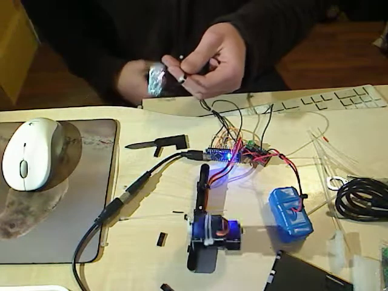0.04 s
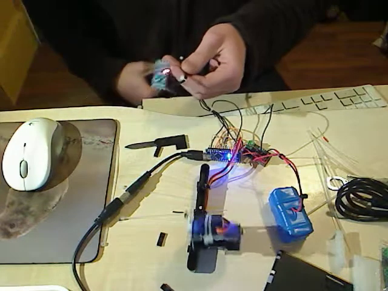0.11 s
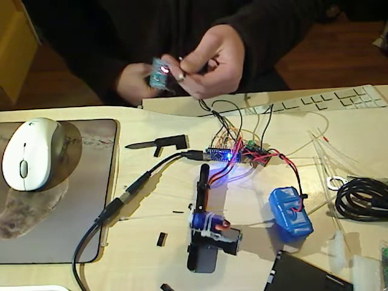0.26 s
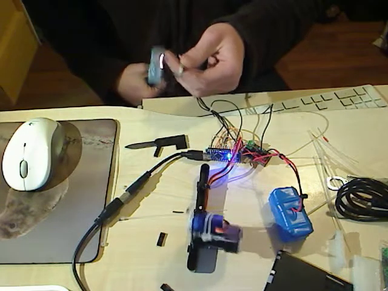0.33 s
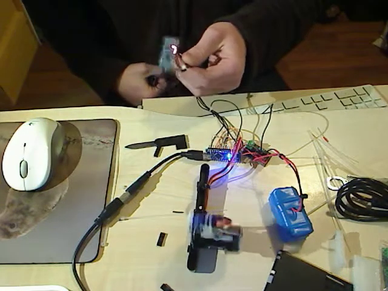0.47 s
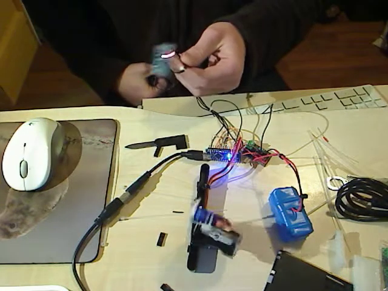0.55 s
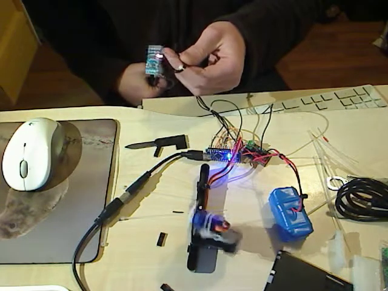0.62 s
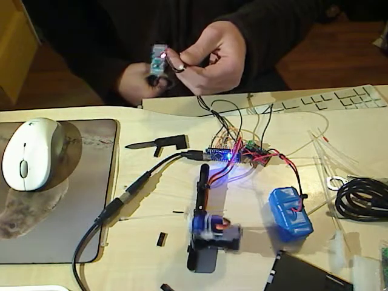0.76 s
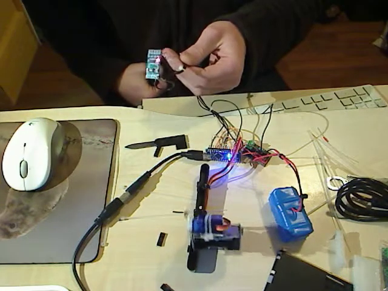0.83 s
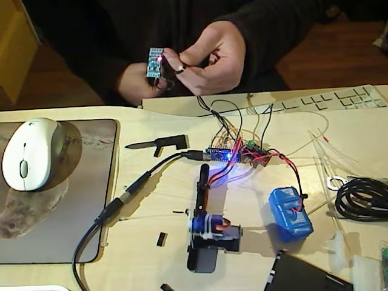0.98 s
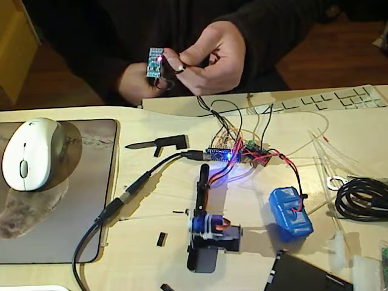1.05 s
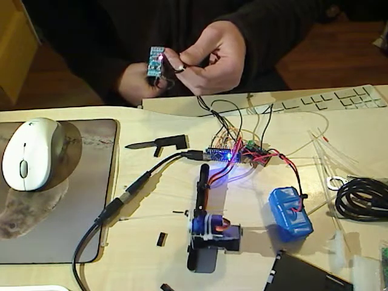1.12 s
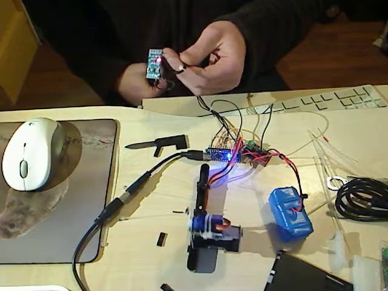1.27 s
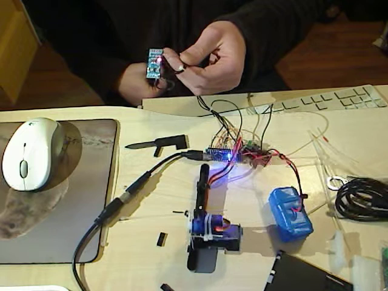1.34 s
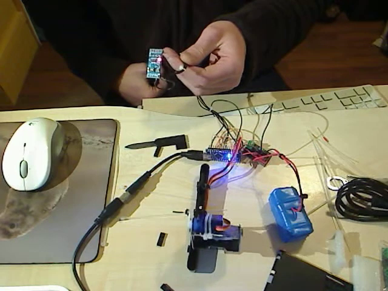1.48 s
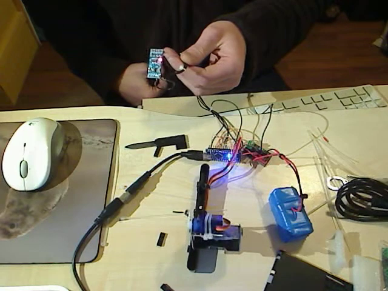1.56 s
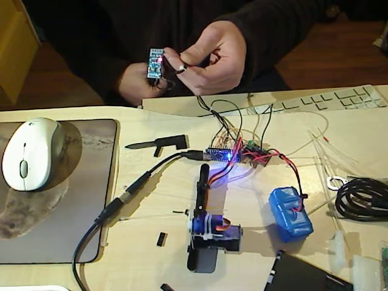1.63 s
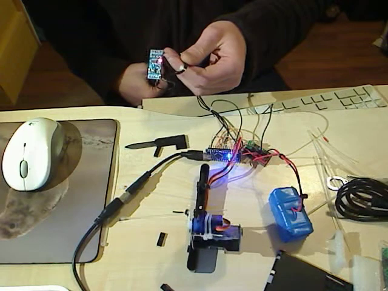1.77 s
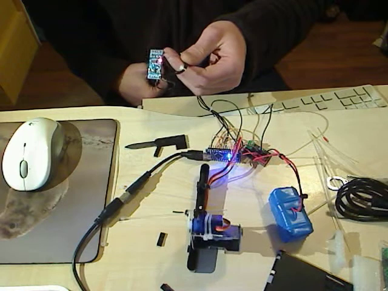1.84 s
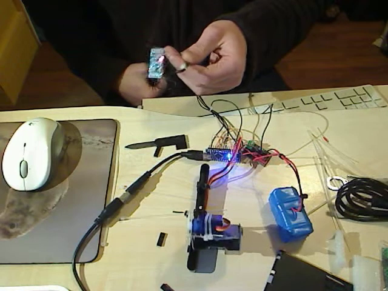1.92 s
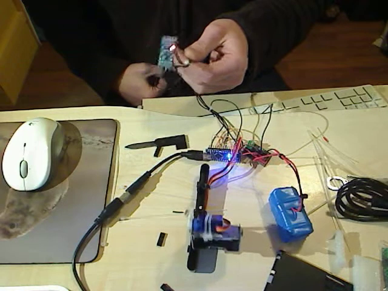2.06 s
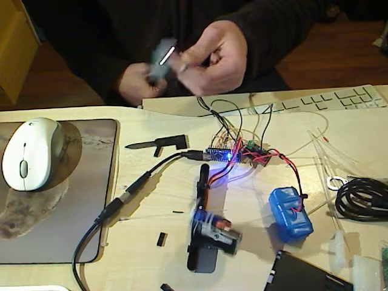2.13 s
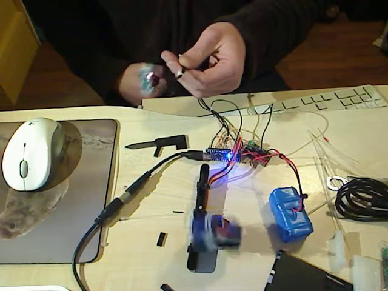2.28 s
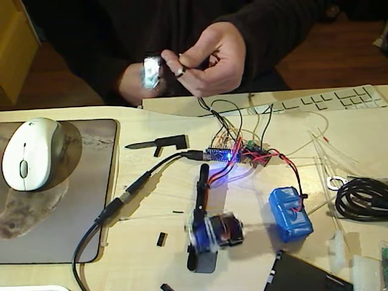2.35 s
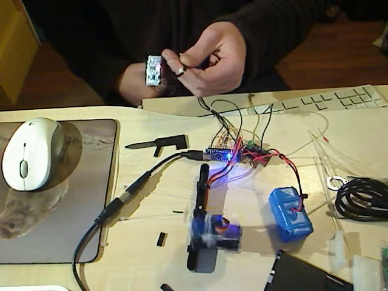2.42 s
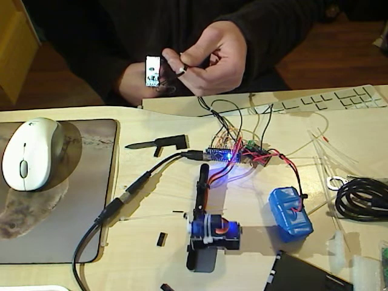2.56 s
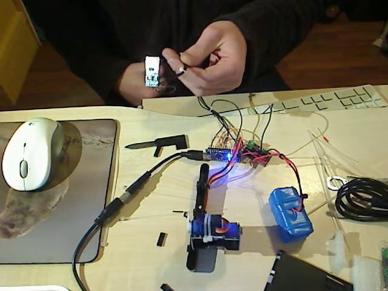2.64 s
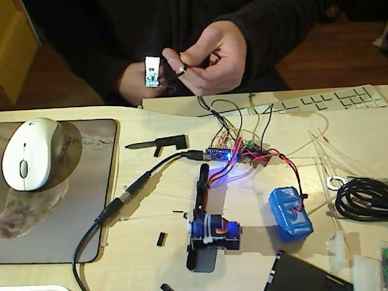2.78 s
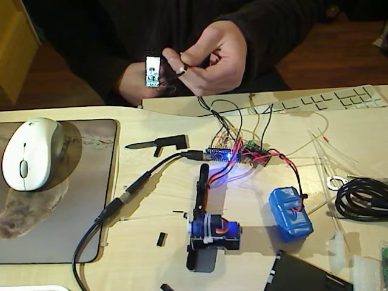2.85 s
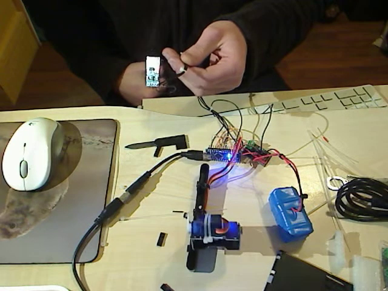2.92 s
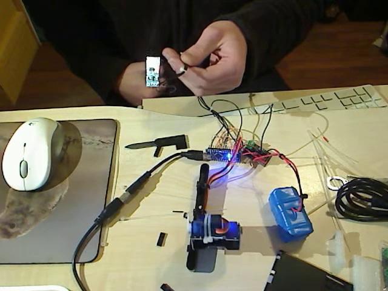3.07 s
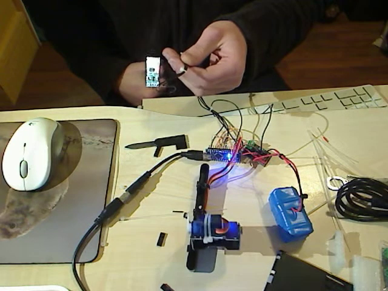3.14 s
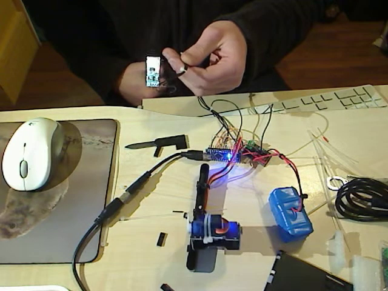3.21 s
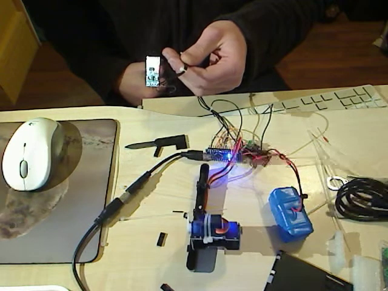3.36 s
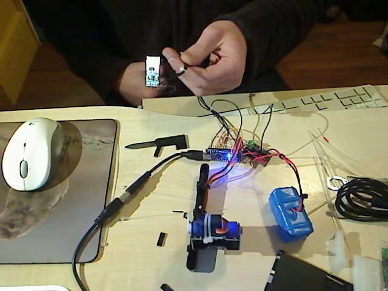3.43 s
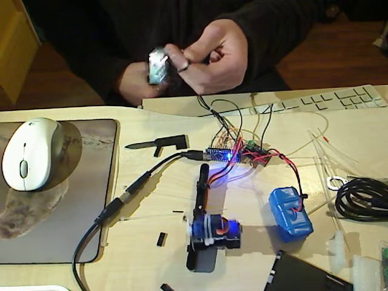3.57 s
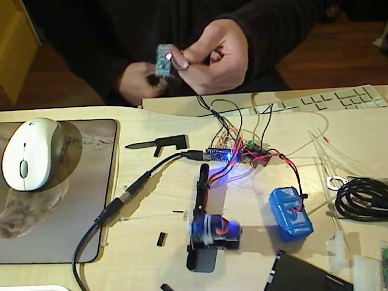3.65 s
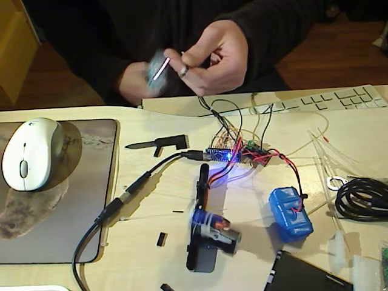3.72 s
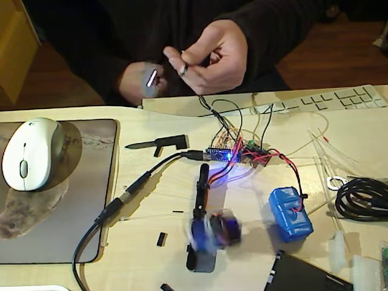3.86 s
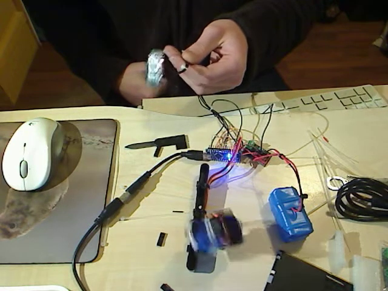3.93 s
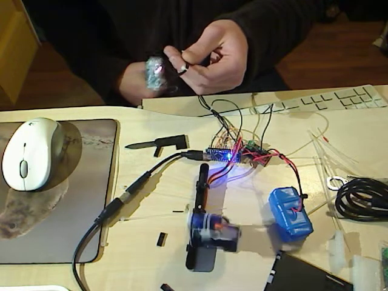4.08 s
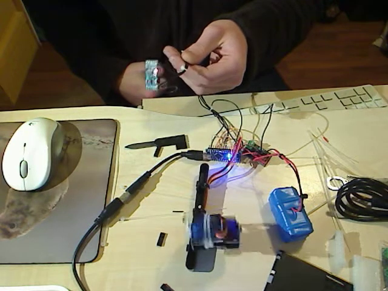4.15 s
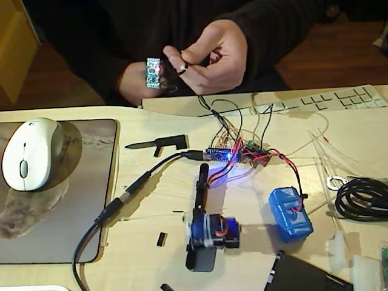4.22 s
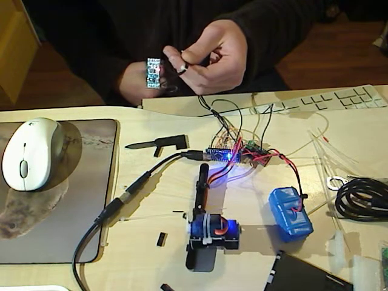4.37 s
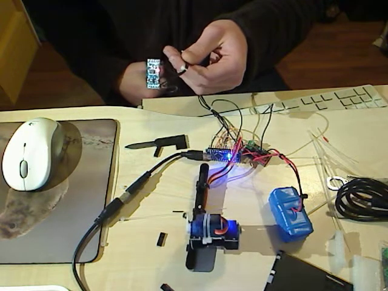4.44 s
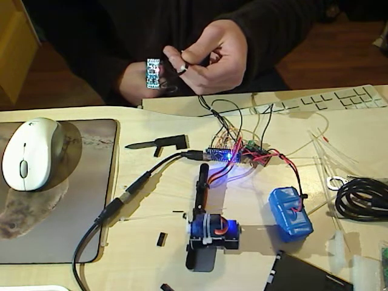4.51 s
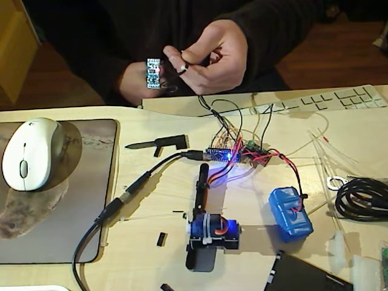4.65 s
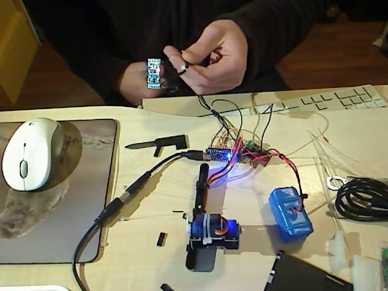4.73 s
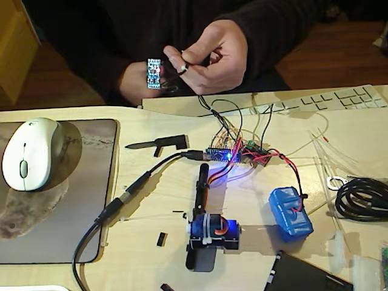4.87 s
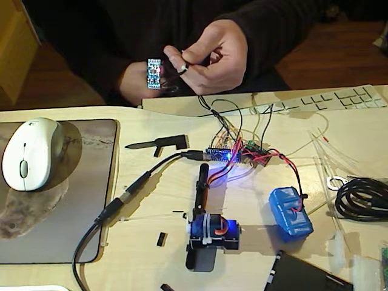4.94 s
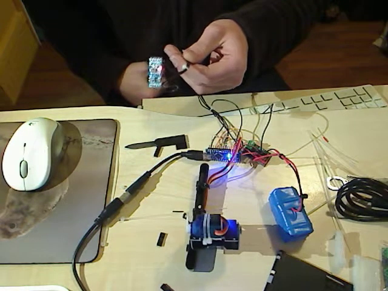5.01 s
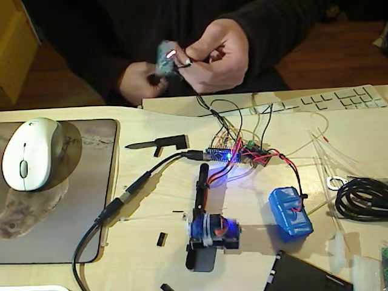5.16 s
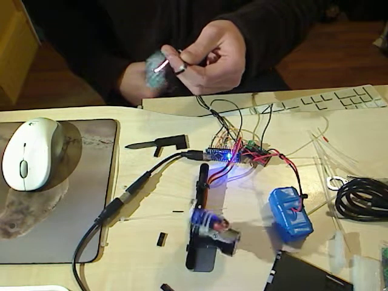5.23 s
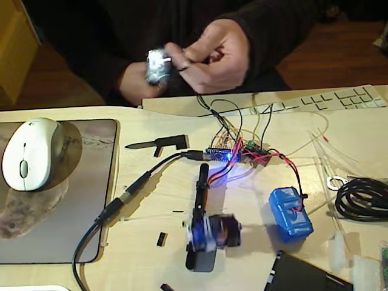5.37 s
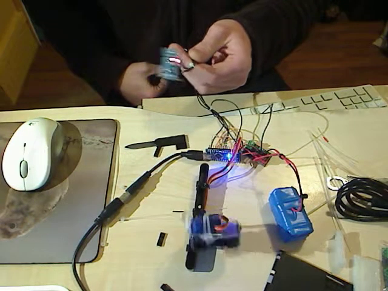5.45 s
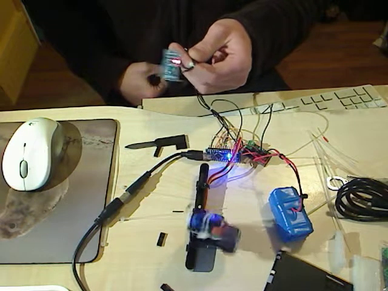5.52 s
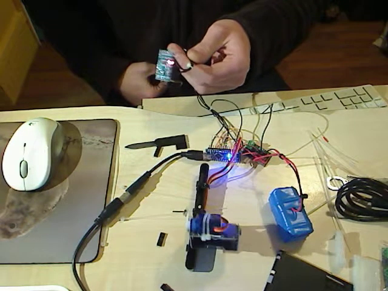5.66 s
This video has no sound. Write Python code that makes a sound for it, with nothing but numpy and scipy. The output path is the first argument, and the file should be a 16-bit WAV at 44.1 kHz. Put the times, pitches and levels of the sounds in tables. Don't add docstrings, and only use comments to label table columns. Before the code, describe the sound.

Tiny plastic gear motors buzz through quick swings and stuttering clicks, thudding on a desktop in a quiet, softly humming room.

```python
import sys
import numpy as np
from scipy import signal
from scipy.fft import rfft, irfft
from scipy.io import wavfile
from scipy.ndimage import uniform_filter1d

SR = 44100
rng = np.random.default_rng(int(sys.argv[2]) if len(sys.argv) > 2 else 0)


def digitize_waveform(pressure):
    field = np.atleast_2d(pressure).T
    bounded = np.clip(field, -1, 1)
    quanta = np.round(bounded * 32767).astype(np.int16)
    wavfile.write(sys.argv[1], SR, quanta)


def level_to_linear(level):
    exponent = np.asarray(level, float) / 20
    return 10 ** exponent


N = 250912
T = np.arange(N) / SR


def level(x, rms_db=0):
    return x * level_to_linear(rms_db) / np.sqrt(np.mean(x ** 2))


def band(x, lo_hz, hi_hz, order=2):
    return signal.sosfilt(signal.butter(order, [lo_hz, hi_hz], "band", fs=SR, output="sos"), x)


def around(x, hz, width_hz, order=2):
    return band(x, hz - width_hz / 2, hz + width_hz / 2, order)


def colour(x, points, size=4096):
    hz, db = np.transpose(points)
    bins_hz = np.arange(1, size // 2 + 2) * SR / size
    gain = level_to_linear(np.interp(np.log(bins_hz), np.log(hz), db))
    cepstrum = irfft(np.log(gain))
    cepstrum[1:size // 2] *= 2
    cepstrum[size // 2 + 1:] = 0
    impulse = irfft(np.exp(rfft(cepstrum)))
    return signal.fftconvolve(x, impulse)[:len(x)]


def walk(rate_hz):
    hold = int(SR / rate_hz)
    steps = np.repeat(rng.standard_normal(N // hold + 1), hold)
    return 1.51 * uniform_filter1d(uniform_filter1d(steps, hold), hold)[:N]


def add(out, start_s, piece):
    i = int(start_s * SR)
    out[i:i + len(piece)] += piece[:N - i]


def fade(t, t60_s):
    return np.exp(-np.log(1000) * t / t60_s)


def ramp(start_s, end_s, slew_s):
    return np.minimum(T - start_s, end_s - T) / slew_s


# frequency in Hz, density in dB per Hz.
HUSH_SPECTRUM = [(15, -25), (25, 6), (70, -19.5), (102, -6.5), (166, -11.5), (197, -12), (258, -15.5),
                 (466, -16.5), (540, -21), (582, -21), (744, -20), (1160, -23), (2190, -31.5),
                 (6010, -29.5), (8910, -50.5), (11600, -86), (19600, -120)]
HUSH_DB = -55
# centre in Hz, wander width in Hz, level in dB.
HUMS = [(48.4, 4.5, -64), (97.8, 6.3, -63.5), (1148, 26, -75.5)]


def room():
    hush = level(colour(rng.standard_normal(N), HUSH_SPECTRUM), HUSH_DB - 3.5)
    hush = hush * level_to_linear(0.17 * walk(8.9))
    hum = sum(level(around(rng.standard_normal(N), hz, width_hz, order=1), db) for hz, width_hz, db in HUMS)
    steady = level_to_linear(-63.5) * np.sin(2 * np.pi * HUMS[1][0] * T)
    return hush + hum + steady


# start in seconds, peak in dB, ring in Hz, t60 in seconds.
DESK_THUDS = [
    (0.592, -43.5, 818, 0.069),
    (2.554, -40, 470, 0.12),
    (3.828, -39, 610, 0.084),
    (4.153, -32.5, 753, 0.13),
    (4.263, -44, 770, 0.12),
    (5.293, -53, 990, 0.084),
]


def thuds():
    out, t = np.zeros(N), T[:6000]
    for start_s, db, hz, t60_s in DESK_THUDS:
        noise = rng.standard_normal(len(t))
        board = np.sin(2 * np.pi * hz * t) + .6 * np.sin(2 * np.pi * .68 * hz * t)
        board += level(band(noise, 400, 950), -3)
        add(out, start_s, level_to_linear(db - 4) * np.minimum(t / 0.0021, 1) * fade(t, t60_s) * board)
    return out


# start in seconds, peak in dB, ring in Hz, upper ring in dB re lower.
PLASTIC_SNAPS = [
    (3.9812, -40, 1950, 8),
    (4.157, -38.5, 1610, 3),
    (5.5159, -26.5, 1820, -7),
    (5.57, -28.5, 1890, -7),
]


def snaps():
    out, t = np.zeros(N), T[:6000]
    for start_s, db, hz, upper_db in PLASTIC_SNAPS:
        rings = np.sin(2 * np.pi * hz * t) + level_to_linear(upper_db) * np.sin(2 * np.pi * 1.585 * hz * t)
        add(out, start_s, level_to_linear(db) * np.minimum(t / .001, 1) * fade(t, .014) * rings)
    return out


# time in seconds, tooth rate in Hz, level in dB.
MESH_WHINES = [
    [(2.4, 3460, -70), (2.406, 3710, -78), (2.418, 3493, -28), (2.46, 3290, -43)],
    [(3.97, 3300, -49), (3.996, 3635, -32), (4.024, 3404, -26.5), (4.04, 3490, -38.5), (4.05, 3707, -71)],
    [(4.25, 3100, -44.5), (4.264, 3200, -36), (4.274, 3180, -38), (4.29, 3580, -48)],
    [(5.56, 3600, -31), (5.588, 4770, -39), (5.6, 4744, -61), (5.61, 4450, -62)],
]


def whines():
    out, waver, throb = np.zeros(N), walk(500), walk(250)
    for rows in MESH_WHINES:
        s, hz, db = np.transpose(rows)
        gate = np.clip(ramp(s[0], s[-1], 0.0027), 0, 1)
        tooth_hz = np.interp(T, s, hz) * (1 + .025 * waver)
        phase = 2 * np.pi * np.cumsum(tooth_hz) / SR
        out += gate * level_to_linear(np.interp(T, s, db) + 1.45 * throb) * np.sin(phase)
    return out


FRAME_S, FIRST_FRAME_S = .02001, .0132
KICK_HZ, KICK_SPREAD_HZ, KICK_SPREAD_DB = 3760, 170, 1.2
KICK_UPPER_DB, KICK_UPPER_SPREAD_DB = -8.5, 4
# start in seconds, length in seconds, first kick in dB, last kick in dB, creep in dB.
EARLY_NUDGES = [(0.138, 0.0091, -40, -35, -65), (0.21, 0.011, -38.5, -39, -62),
                (.253, 0.039, -41, -44, -54.5), (0.456, .01, -32, -40, -57), (1.137, 0.033, -48, -39, -75),
                (1.217, 0.055, -42, -36.5, -55), (1.304, 0.067, -38, -41, -55),
                (1.387, 0.088, -36, -39, -53), (1.521, 0.072, -52, -39, -58),
                (1.598, 0.063, -47, -47, -60.5), (1.687, 0.047, -49, -39, -61.5),
                (1.78, 0.039, -39.5, -47, -64), (1.833, 0.033, -56, -47, -60.5),
                (1.88, 0.11, -41, -50.5, -65.5), (1.991, .07, -45, -52, -63.5),
                (2.077, 0.034, -45, -39.5, -52.5), (2.121, 0.045, -38, -45, -53),
                (2.196, 0.08, -35.5, -37, -52.5)]
LATE_NUDGES = [(2.655, .01, -37.5, -34, -65), (2.735, 0.048, -42, -36, -55.5),
               (2.855, 0.056, -45.5, -36, -61.5), (2.955, 0.081, -44.5, -42.5, -66.5),
               (3.055, 0.02, -54, -59, -70), (3.295, .05, -47, -43, -65.5), (3.355, 0.038, -46, -36.5, -61),
               (3.455, .01, -43.5, -43, -69), (3.535, 0.086, -45.5, -42.5, -66.5),
               (3.635, .01, -42, -40, -63.5), (3.655, .05, -56, -37.5, -63.5),
               (3.715, 0.038, -41.5, -32, -59), (3.795, 0.04, -36.5, -32.5, -53),
               (4.456, 0.052, -40.5, -47, -58), (4.536, 0.061, -47.5, -43.5, -58),
               (4.636, 0.053, -46.5, -35.5, -57), (4.696, 0.018, -46, -52, -59),
               (4.756, .01, -45.5, -48, -74), (4.816, 0.0077, -49.5, -45, -63),
               (4.856, 0.039, -51.5, -48, -63.5), (4.916, 0.023, -42, -52, -71),
               (5.076, 0.062, -45.5, -39.5, -69), (5.156, 0.08, -44, -35, -57.5),
               (5.236, 0.043, -54, -32.5, -57.5)]


def kicks():
    out, t = np.zeros(N), T[:1600]
    frames_s = np.arange(FIRST_FRAME_S, T[-1], FRAME_S)
    chance = rng.standard_normal((len(frames_s), 3))
    noises = rng.standard_normal((len(frames_s), len(t)))
    for start_s, length_s, first_db, last_db, _ in EARLY_NUDGES + LATE_NUDGES:
        end_s = start_s + length_s
        for k in np.flatnonzero((frames_s > start_s - FRAME_S / 2) & (frames_s < end_s)):
            db = np.interp(frames_s[k], [start_s, end_s], [first_db, last_db]) + KICK_SPREAD_DB * chance[k, 0]
            hz = KICK_HZ + KICK_SPREAD_HZ * chance[k, 1]
            upper_db = KICK_UPPER_DB + KICK_UPPER_SPREAD_DB * chance[k, 2]
            t60_s = .028 * level_to_linear(.25 * (db + 44))
            chatter = noises[k] * (1 - np.exp(-t / .0005)) * fade(t, t60_s)
            ring = level(band(chatter, hz - 450, hz + 450))
            ring += level(band(chatter, 3260, 5220, order=3), upper_db + 4.5)
            ring += level(band(chatter, 6200, 6500), upper_db - 2.0)
            add(out, frames_s[k] - .0008, level_to_linear(db) * ring / np.abs(ring).max())
    return out


def teeth(per_s, scatter_db):
    hit = rng.random(N) < per_s / SR
    return hit * rng.standard_normal(N) * level_to_linear(scatter_db * rng.exponential(size=N))


# frequency in Hz, density in dB per Hz.
CASE_SPECTRUM = [(760, -66.5), (1300, -33), (1790, -17.5), (2060, -17.5), (2890, -14), (3730, -4.5),
                 (4150, -4), (4530, -3), (5360, -5.5), (6000, -12), (6510, -15), (7830, -19.5),
                 (8490, -26.5), (8910, -37.5), (11600, -84.5), (19600, -120)]
CASE_MODES_HZ = [2960, 3320, 3590, 3860, 4350, 4590, 4820, 5020, 5290, 5500, 5740, 6310, 6560, 6900, 7300,
                 7770]


def shell(x, ring_db):
    modes = sum(level_to_linear(4.5 * walk(16)) * band(x, hz - 25, hz + 25, order=1) for hz in CASE_MODES_HZ)
    return colour(x + level_to_linear(ring_db) * modes, CASE_SPECTRUM)


COAST_DB_PER_S, PAN_CREEP_DB, PAN_FULL_DB = 254.5, 0, -36.5
# time in seconds, tilt servo effort in dB, pan servo effort in dB.
EARLY_SWINGS = [
    [(0.0, -47, -42.5), (0.072, -40.5, -44), (0.146, -48.5, -57), (0.156, -45, -47), (0.166, -51, -57),
     (0.174, -51, -47.5), (0.205, -56.5, -70)],
    [(0.275, -52, -50), (0.319, -43.5, -47.5), (0.377, -41, -52), (0.385, -49, -58), (0.407, -48, -55),
     (0.415, -51, -49), (0.425, -49, -53), (0.45, -51, -51)],
    [(0.455, -56, -50), (0.467, -49, -48), (0.523, -38.5, -45.5), (0.585, -45.5, -42.5), (0.639, -41, -47),
     (0.717, -46, -41), (0.759, -42.5, -40.5), (0.77, -38.5, -50)],
    [(0.775, -43, -45.5), (0.871, -41, -48.5), (0.925, -39.5, -46), (0.941, -47, -53.5),
     (1.015, -39, -40.5), (1.049, -48.5, -56), (1.073, -46.5, -53), (1.2, -64, -58)],
]
LATE_SWINGS = [
    [(2.195, -45.5, -54.5), (2.281, -39.5, -50.5), (2.323, -43, -50.5), (2.437, -34.5, -36),
     (2.487, -44, -46), (2.521, -36.5, -37.5), (2.595, -46, -49), (2.675, -43.5, -45.5), (2.71, -57.5, -67)],
    [(3.715, -57, -63), (3.743, -44, -51.5), (3.781, -49, -64), (3.823, -37.5, -44), (3.923, -44, -46),
     (3.967, -39, -39), (4.019, -37.5, -30), (4.063, -39.5, -48), (4.07, -42, -43)],
    [(4.075, -43.5, -42.5), (4.115, -39, -42), (4.141, -40, -40.5), (4.205, -44.5, -43),
     (4.271, -38.5, -38), (4.323, -46.5, -48), (4.385, -42, -49), (4.419, -50.5, -55.5), (4.44, -55, -63.5)],
    [(5.275, -50.5, -49.5), (5.319, -38.5, -44.5), (5.397, -45, -45.5), (5.505, -38.5, -34.5),
     (5.515, -40, -43), (5.531, -39, -41.5), (5.575, -52, -38.5), (5.591, -41.5, -41.5),
     (5.689, -37.5, -43.5)],
]


def efforts():
    def power(s, db):
        coast_db = COAST_DB_PER_S * np.maximum(T - s[-1], 0)
        return level_to_linear(2 * (np.interp(T, s, db, left=-150) - coast_db))

    creep = sum(power([s, s + length_s], [db, db]) for s, length_s, _, _, db in EARLY_NUDGES + LATE_NUDGES)
    tilt, pan = 0, 0
    for rows in EARLY_SWINGS + LATE_SWINGS:
        s, tilt_db, pan_db = np.transpose(rows)
        tilt = tilt + power(s, tilt_db)
        pan = pan + power(s, pan_db)
    pan = np.minimum(pan, level_to_linear(2 * PAN_FULL_DB))
    return tilt + creep, pan + creep * level_to_linear(2 * PAN_CREEP_DB)


LEAN_SLEW_S = 0.017
BUZZ_SLOPE, REST_BUZZ_DB = 0.32, -19.5
# start in seconds, length in seconds, buzz in dB.
DESK_LEANS = [(0, 0.13, -54.5), (0.273, 0.12, -58.5), (0.496, 0.29, -56), (0.778, .27, -56),
              (2.231, .23, -54), (2.506, 0.13, -58), (3.823, 0.212, -53), (4.116, .19, -56.5),
              (5.292, .14, -59.5), (5.442, 0.26, -54.5)]
# centre in Hz, width in Hz, level in dB.
DESK_MODES = [(99, 50, -14), (134.2, 10, -1.5), (261.5, 57, 3.5), (343, 270, -11), (471.5, 35, -3),
              (603, 110, 2), (760, 92, 4), (976, 216, -1.5)]


def desk_buzz(pan_db):
    lean = sum(level_to_linear(db) * np.clip(ramp(s, s + length_s, LEAN_SLEW_S) + 1, 0, 1) for s, length_s, db in DESK_LEANS)
    buzz = lean * level_to_linear(BUZZ_SLOPE * (pan_db + 35)) + level_to_linear(pan_db + REST_BUZZ_DB)
    shake = teeth(4000, 1.3)
    desk = sum(level_to_linear(db + 3 * walk(35)) * level(around(shake, hz, width_hz)) for hz, width_hz, db in DESK_MODES)
    return buzz * level(desk)


SIZZLE_DB, PAN_SIZZLE_DB = -4.5, -2


def gears():
    tilt, pan = efforts()
    tilt_db, pan_db = 10 * np.log10(tilt), 10 * np.log10(pan)
    sizzle_db = 10 * np.log10((tilt + pan * level_to_linear(2 * PAN_SIZZLE_DB)) * level_to_linear(2 * SIZZLE_DB))
    frame_phase = (T - FIRST_FRAME_S) / FRAME_S % 1
    sag_db = np.clip(.45 * (-45 - tilt_db), 1, 5.5)
    drive = level_to_linear(uniform_filter1d(-sag_db * (frame_phase - .4), size=60))
    case = shell(teeth(9000, 1.6), -2.5)
    out = level_to_linear(0.66 * pan_db - 25.5) * level(band(case, 1340, 2760))
    out += level_to_linear(pan_db + 1.8 * walk(90)) * level(band(case, 2100, 4300))
    out += level_to_linear(tilt_db + 1.2 * walk(90)) * level(band(case, 4150, 5950, order=3))
    out += level_to_linear(sizzle_db + 1.5 * walk(90)) * level(band(case, 5880, 9000, order=3))
    out += level_to_linear(tilt_db - 10) * level(band(case, 4380, 4704))
    return drive * out + desk_buzz(pan_db)


BOUNCE_S, BOUNCE = .000497, .25


def scene():
    servo = thuds() + snaps() + whines() + kicks() + gears()
    servo = servo - BOUNCE * np.interp(T - BOUNCE_S, T, servo)
    t = T[:8000]
    walls = rng.standard_normal(len(t)) * fade(t, 0.3) * (t > .003)
    wet = signal.fftconvolve(servo, walls / np.linalg.norm(walls))[:N]
    return (servo + level_to_linear(-12) * wet + room())[None]


# centre in Hz, width in Hz, depth 0-1.
HOUSING_NOTCHES = [(6030, 300, .15), (8020, 200, .2)]


def microphone(x):
    x = signal.sosfilt(signal.cheby1(8, .5, 8350, fs=SR, output="sos"), x)
    for hz, width_hz, depth in HOUSING_NOTCHES:
        x = x - depth * around(x, hz, width_hz, order=1)
    return x


def thrift(x, mask_db, from_hz):
    hz, _, z = signal.stft(x, SR, nperseg=1024)
    power = uniform_filter1d(np.abs(z) ** 2, size=6, axis=-1)
    neighbours = uniform_filter1d(power, size=24, axis=-2)
    sunk = uniform_filter1d(power, size=2, axis=-2) / (neighbours + 1e-30)
    loud_db = 10 * np.log10(power[:, hz > 2000].sum(axis=-2, keepdims=True) + 1e-30)
    edge_db = mask_db - np.clip(.15 * (loud_db + 52), 0, 3) - 2.5 * (hz < from_hz)[:, None]
    masked = (sunk < level_to_linear(2 * edge_db)) & ((hz > 2000) & (hz < 8300))[:, None]
    masked = uniform_filter1d(1. * masked, size=2, axis=-2)
    masked = uniform_filter1d(masked, size=3, axis=-1) > .01
    return signal.istft(z * np.where(masked, .02, 1), SR, nperseg=1024)[1][..., :x.shape[-1]]


def low_pass(x):
    return signal.sosfilt(signal.butter(12, 9060, fs=SR, output="sos"), x)


OFFSET = -.01275


def record(dry):
    mix = thrift(microphone(dry), mask_db=-4.8, from_hz=5600) + OFFSET
    return low_pass(mix)


dry = scene()
out = record(dry)
digitize_waveform(out)
```